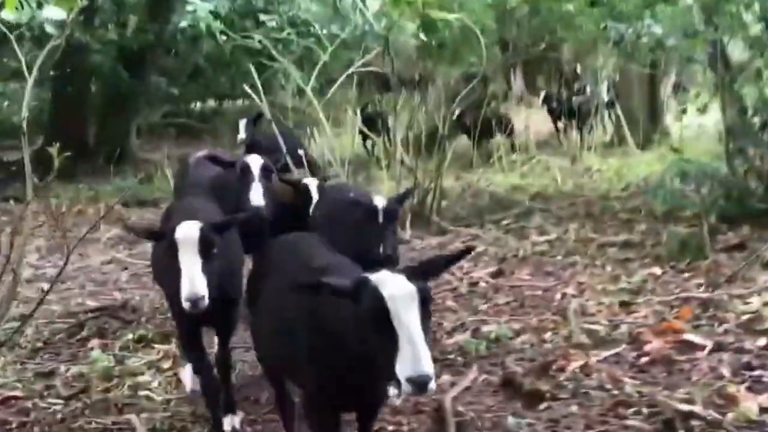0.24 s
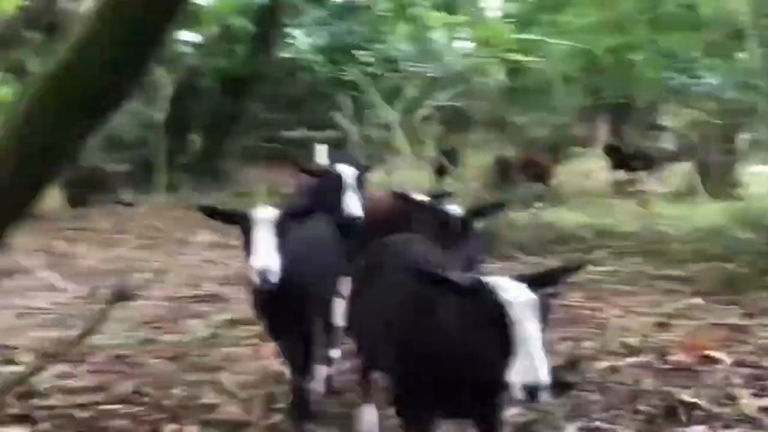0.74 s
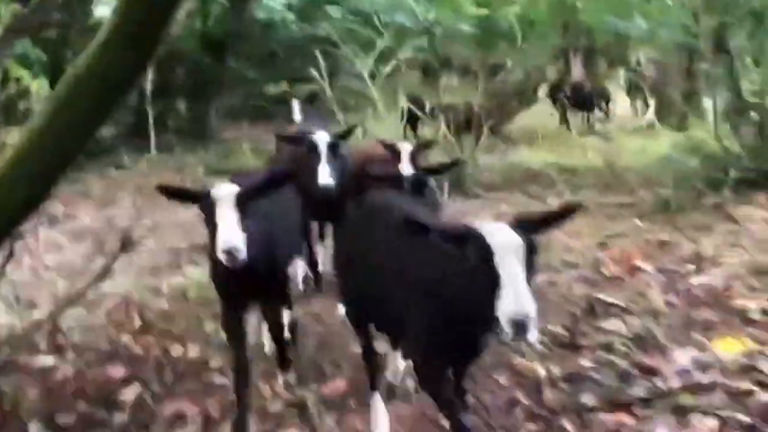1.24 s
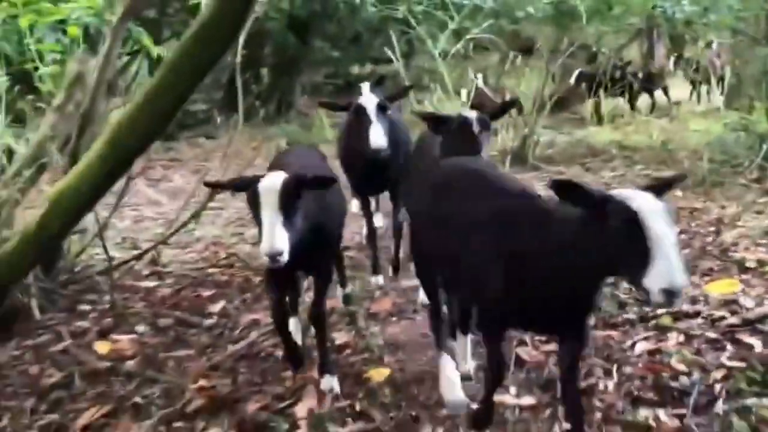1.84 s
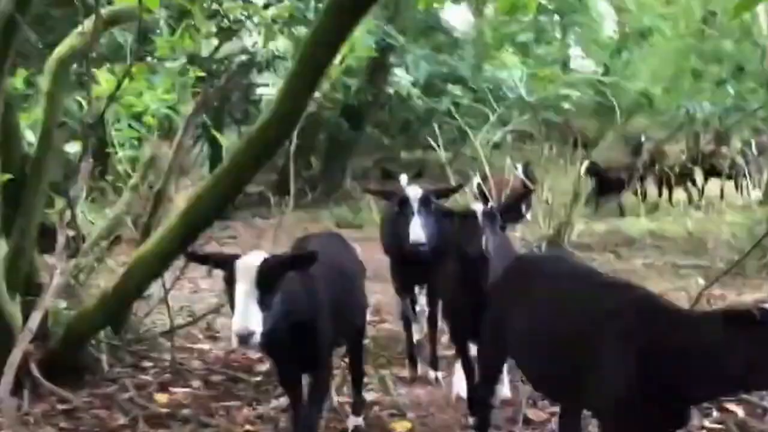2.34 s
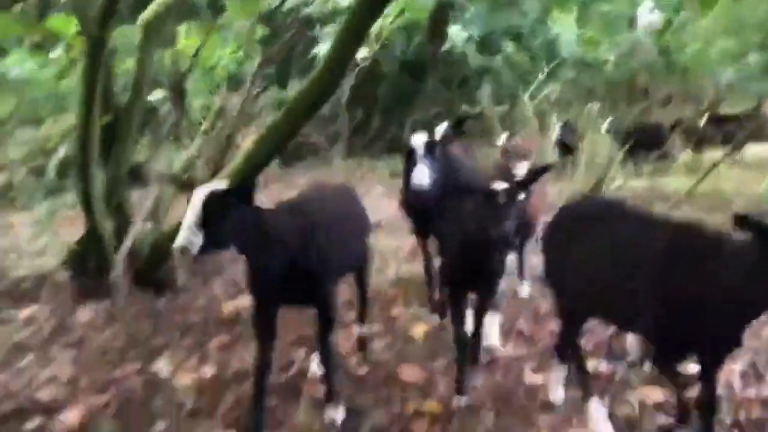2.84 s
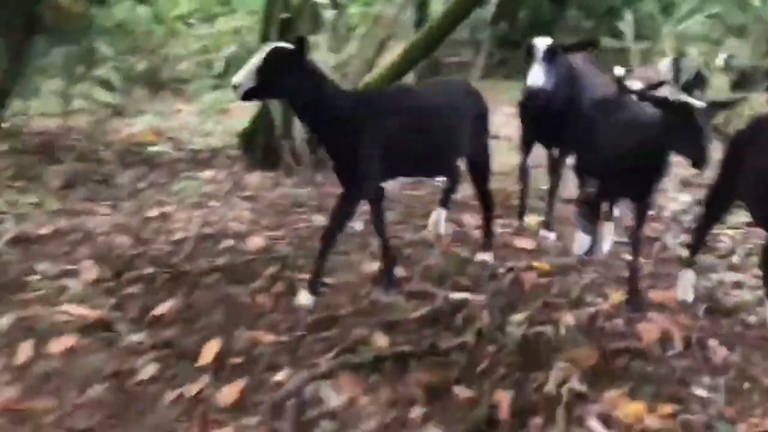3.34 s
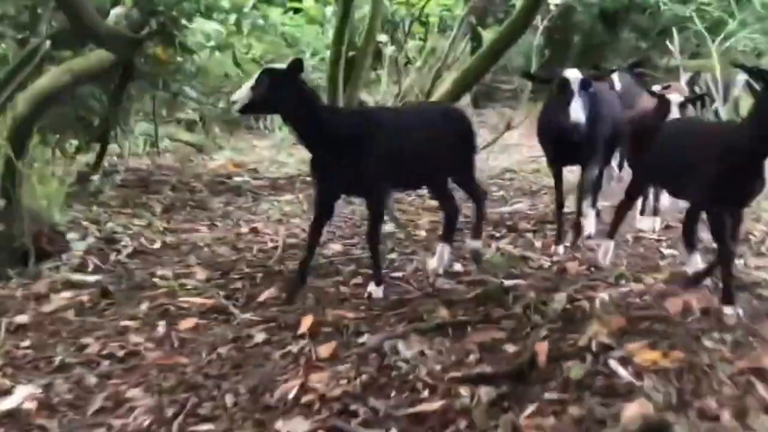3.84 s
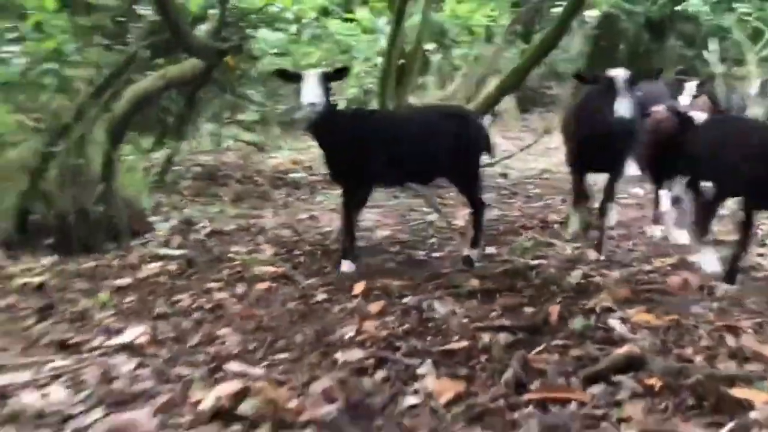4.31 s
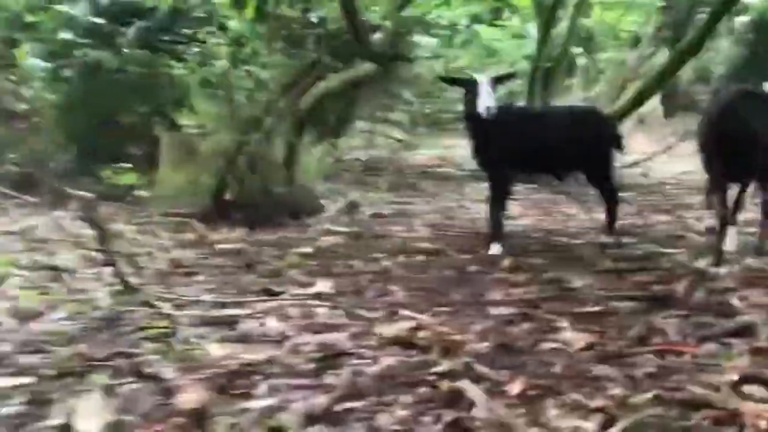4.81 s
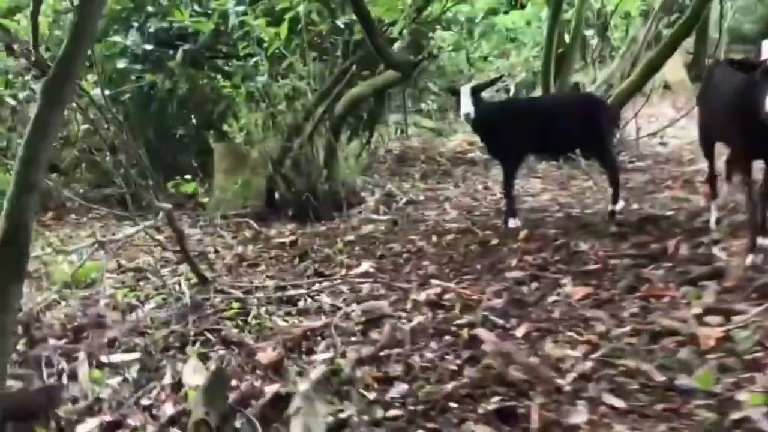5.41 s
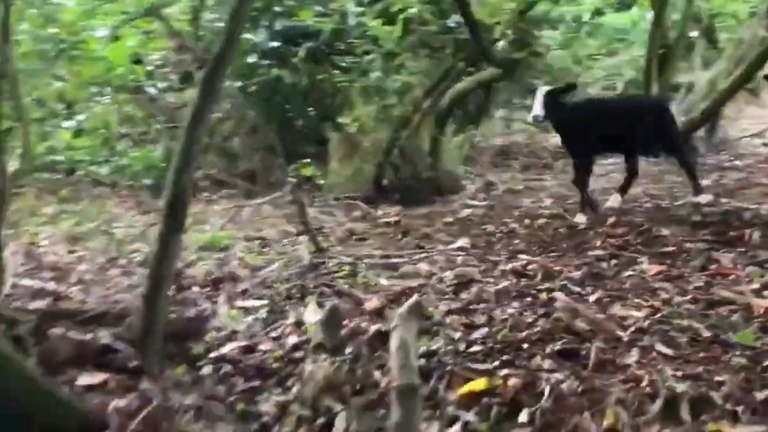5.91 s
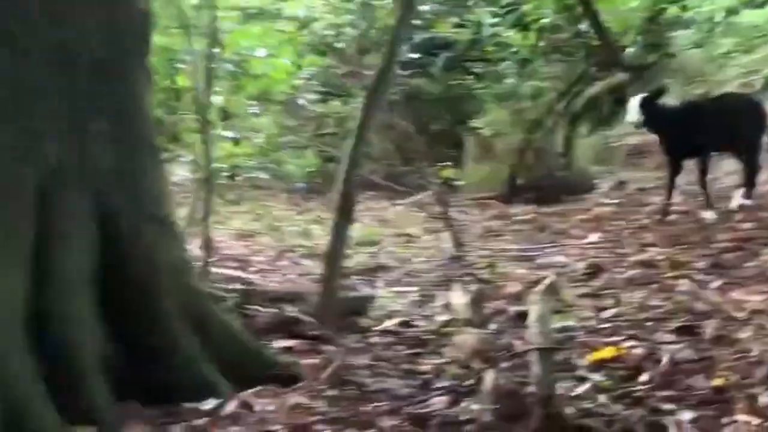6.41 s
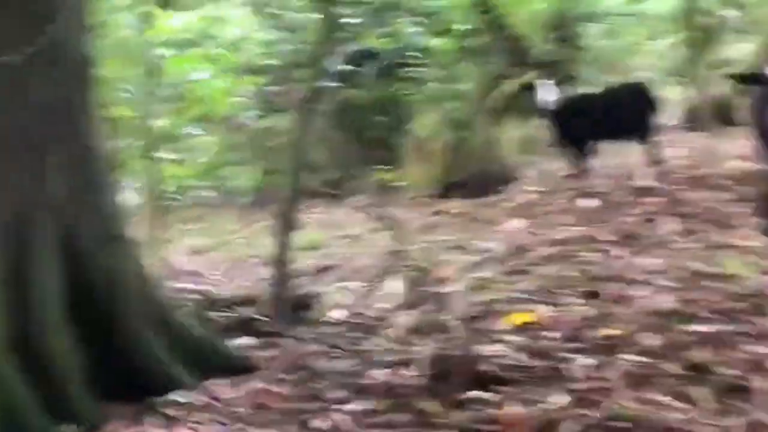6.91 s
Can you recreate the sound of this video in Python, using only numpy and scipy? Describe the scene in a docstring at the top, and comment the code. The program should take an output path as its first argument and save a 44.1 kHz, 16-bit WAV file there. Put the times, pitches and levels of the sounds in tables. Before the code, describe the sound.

Sheep moving over a woodland floor, heard from near the flock. Dry leaves crackle constantly, soft treads thud, hooves knock roots and twigs snap sharply. Six separate wavering bleats differ in pitch and roughness; the later ones start with a brief closed-mouth hum. The first and last are loudest, the third quietest and most quavering. Quiet outdoor air and short, sparse reflections from trunks.

```python
"""Sheep walk along a leafy woodland path; rustling litter, low rumble and quiet air last throughout.
A bleat is already sounding at the start, and a stick breaks during it; a second bleat follows at 1 s.
A quavering third comes at 3 s, then a ragged deep one, a clear one and a last one, each after a hum.
Pulses and breath ring a throat for each voice; feet are short pushes and noise bursts that thud,
knock and snap twigs all along. Sparse, dull echoes come back from the trees."""
import sys
import numpy as np
from scipy import signal
from scipy.fft import rfft, irfft
from scipy.io import wavfile
from scipy.ndimage import uniform_filter1d, map_coordinates

SR = 44100
rng = np.random.default_rng(int(sys.argv[2]) if len(sys.argv) > 2 else 0)


def transcribe(u):
    """Save the signal u as a 16-bit wav file named by the first command-line argument.

    u: samples, shape (n,) or (channels, n), limited to [-1, 1]; the rate is SR.
    q: integer samples, one column per channel.
    """
    v = np.clip(np.atleast_2d(u).T, -1, 1)
    q = np.round(v * 32767).astype(np.int16)
    wavfile.write(sys.argv[1], SR, q)


N = 315315
TIME = np.arange(N) / SR
HZ = np.fft.rfftfreq(4096, 1 / SR)  # frequencies at which all filters are drawn
EDGE_HZ = 16000  # upper limit of the recorder

# Colour of the still air. Each row: frequency in Hz, relative level in dB per Hz.
AIR = [(20, -16), (60, 5.5), (150, -2), (250, -7.5), (450, -8), (1000, -2.5), (1700, -14.5), (8000, -22.5),
       (16000, -12)]
AIR_DB = -64.5
# Bustle of the walking flock. Each row: time in seconds, leaf rustle in dB before the layers are mixed.
BUSTLE = [(0.0, -54.5), (0.42, -53.5), (0.8, -60.5), (1.89, -58.5), (2.29, -67), (2.81, -59.5), (2.95, -60),
          (4.92, -67.5), (5.73, -67), (6.35, -72), (6.77, -62), (7.15, -68)]
# Colours of the leaf rustle and the ground rumble. Each row: frequency in Hz, relative level in dB.
LEAVES = [(150, -25), (400, -4), (1000, -2), (2500, -3.5), (4600, -2), (8000, -5.5), (12500, -11),
          (15000, -11), (16000, -14)]
RUMBLE = [(20, -63), (53, -12), (120, -3), (165, -5), (210, -8.5), (320, -12.5), (600, -13.5), (1200, -59)]
GROUND_DB, GROUND_FOLLOWS = -61.5, 0.39  # rumble at average bustle, and its dB for each dB of bustle

# Soft treads on the soil, and hooves knocking on sticks and roots.
# Each row: start in seconds, peak in dB before a common gain, centre in Hz.
TREADS = [(0.141, -38, 166), (0.418, -44, 155), (0.566, -42.5, 141), (1.269, -41, 140), (1.409, -50, 129),
          (3.053, -43, 200), (3.145, -46.5, 234), (3.55, -44, 135), (3.79, -44, 316), (4.33, -44.5, 120),
          (5.29, -44, 304), (5.787, -37.5, 257), (5.843, -40.5, 133), (6.45, -46.5, 130), (6.686, -37, 163),
          (6.712, -42, 170)]
KNOCKS = [(2.474, -46.5, 1410), (2.701, -47.5, 437), (2.831, -47.5, 740), (2.869, -40.5, 1050),
          (3.054, -40.5, 1240), (3.147, -46, 398), (3.257, -40.5, 497), (3.543, -48, 570),
          (4.214, -40, 900), (4.305, -37.5, 830), (4.33, -45, 525), (4.477, -44.5, 470),
          (4.548, -44.5, 1020), (4.654, -49, 490), (5.787, -44, 425), (5.8435, -33, 592)]
# Twigs and dry leaves snapping. Each row: start in seconds, level in dB before a common gain,
# centre in Hz, relative level of the crushed leaves in dB, decay of the crack in seconds.
SNAPS = [(0.337, -31, 6000, -16, .0015), (0.3893, -24.5, 5500, -25, .0007), (0.468, -32, 4850, -4, .002),
         (0.558, -39, 3500, -8, .002), (0.748, -38, 2600, -13, .0015), (1.0261, -41, 6000, -18, .001),
         (1.718, -41.5, 7580, 2, .001), (1.948, -39, 5510, 5, .001), (2.129, -42.5, 6800, -14, .001),
         (2.319, -35.5, 3200, -21.5, .0013), (2.453, -41.5, 4700, -11, .001), (2.4744, -39, 2620, -2, .002),
         (2.702, -42, 4500, -6, .002), (2.774, -39.5, 4800, -20, .001), (2.809, -41, 2500, -20, .001),
         (2.872, -35, 2180, -13, .004), (3.257, -33, 2800, -16, .0012), (4.1079, -39, 5035, -39, .001),
         (4.478, -40, 1610, -10, .002), (4.869, -33.5, 5770, -18, .0018), (5.0243, -40, 2440, -15, .001),
         (5.6203, -30.5, 2600, -19, .002), (5.8434, -26, 2200, -29, .0005)]
# Colour of the snapping twigs and dry leaves. Each row: frequency in Hz, level in dB.
TWIG = [(1000, 0.5), (7500, 0.5), (11500, -4), (14500, 4)]
# A springy stick breaking in two cracks. Each row: start in seconds, level in dB.
STICK_CRACKS = [(0.3343, -34), (0.3372, -30)]
# Tones of that stick. Each row: frequency in Hz, level in dB, time to fall by 60 dB in seconds.
STICK = [(3320, 1, 0.016), (4000, -7, 0.015), (5080, -1, 0.0069), (8300, -5, 0.012)]

# The six bleats. Each row: mouth opening in seconds, length in seconds, time to full effort in seconds,
# level in dB, swell up to it in dB, fade after it in dB, share of the upper throat resonances in dB.
BLEATS = [(-0.1, 0.51, 0.053, -37, -24, 13.5, -2.0), (1.025, 0.99, 0.19, -46, 11, 16.5, -1.9),
          (2.99, 0.69, 0.23, -52, 13, 1.5, -1), (3.64, 0.745, 0.16, -44, 8, 8, -1),
          (5.247, 0.53, 0.28, -45.5, 1, 20.5, -2), (6.535, 0.92, 0.16, -37, 8, 17.5, -7.5)]
ATTACK_S, RELEASE_S, FADE_POWER, PITCH_LEAD_S = 0.034, 0.029, 2.77, 0.012
STRAIN_HZ = 2800  # overtones above this need a strained voice
# Resonances of each throat. Each row: frequency in Hz, width in Hz, relative level in dB.
FIRST_THROAT = [(250, 780, -6), (743, 130, 6.5), (940, 104, 7), (1270, 360, 0.5), (1870, 330, 3),
                (2240, 270, -4), (2456, 330, -0.5), (3190, 350, -7.5), (5800, 2000, -50)]
SECOND_THROAT = [(186, 35, -13), (793, 460, -9.5), (940, 250, -28), (1370, 460, -11), (1820, 270, 3.5),
                 (2538, 216, 4), (3190, 670, -8.5), (3960, 410, -10)]
QUAVER_THROAT = [(252, 360, -15), (800, 200, -7), (1790, 260, 4.5), (2670, 410, 2), (2970, 340, 5),
                 (4400, 780, -9.5)]
DEEP_THROAT = [(218, 111, 11), (608, 236, 7.5), (900, 190, -3), (1390, 250, 11), (2087, 340, 4.5),
               (2430, 420, -3), (3370, 1440, -7.5), (5340, 700, -20)]
CLEAR_THROAT = [(410, 790, 0.5), (810, 200, 3.5), (1034, 160, 3), (1590, 420, 9), (2010, 300, 9.5),
                (3080, 770, 5.5), (3640, 590, 4.5), (5500, 3000, -14)]
LAST_THROAT = [(250, 250, -16), (520, 300, -21), (805, 130, 1), (1350, 600, -20), (1710, 300, -11),
               (2200, 400, -24), (2660, 290, -9), (3080, 250, -22), (3550, 400, -23), (4280, 350, -21),
               (4850, 350, -27), (5600, 2500, -34)]
# Pitch of each voice before its tremble. Each row: time in seconds, pitch in Hz.
FIRST_PITCH = [(0.0, 246.2), (0.029, 252.3), (0.047, 242.7), (0.089, 243.9), (0.11, 229.4), (0.136, 238.9),
               (0.25, 227.4), (0.274, 229.8), (0.301, 219.8), (0.39, 208.7)]
SECOND_PITCH = [(1.03, 155), (1.107, 177.5), (1.157, 183.4), (1.445, 193.1), (1.612, 182.4), (2.0, 173.3)]
QUAVER_PITCH = [(2.98, 214.2), (3.194, 222.5), (3.472, 223.6), (3.648, 221.6)]
DEEP_PITCH = [(3.521, 109.4), (3.67, 136.3), (3.761, 158.8), (3.871, 163), (4.102, 156.6), (4.165, 147.2),
              (4.341, 139.7)]
CLEAR_PITCH = [(5.183, 225.4), (5.244, 241), (5.272, 259.5), (5.316, 266), (5.552, 262.9), (5.625, 251.7),
               (5.691, 241.3)]
LAST_PITCH = [(6.42, 131.7), (6.46, 148.9), (6.516, 163.3), (6.563, 181.4), (6.676, 194.6), (6.785, 204.3),
              (7.109, 202.2), (7.15, 193.7)]
# How ragged the voice folds run. One row for each bleat, of pairs: time in seconds, hoarseness from 0 to 1.
HOARSENESS = [
    [(0, .5), (.1, .5), (.125, .15), (.26, .18), (.31, .55), (.4, .55)],
    [(1.03, .45), (1.42, .18), (1.6, .27), (2, .35)],
    [(3, .38)],
    [(3.64, .62), (3.8, .5), (3.87, .18), (4.04, .17), (4.12, .4), (4.2, .58), (4.38, .62)],
    [(5.25, .25), (5.33, .1), (5.55, .09), (5.62, .45), (5.7, .55)],
    [(6.54, .2), (6.68, .3), (6.8, .2), (6.89, .05), (6.99, .06), (7.15, .12)],
]
# Lower throat resonances. One row for each bleat, of pairs: time in seconds, relative level in dB.
LOWS = [
    [(0, -1.5), (.03, 1.5), (.087, -5), (.105, -1), (.24, 2), (.3, -0.5), (.39, 3.5)],
    [(1.03, -11), (1.1, -6), (1.7, -1.5), (1.95, 4.5)],
    [(3, 0.5)],
    [(3.66, 2), (3.77, 2), (3.84, 0.5), (4.0, 4.5), (4.1, 2), (4.17, 1), (4.26, 2.5), (4.36, -10)],
    [(5.25, 1.5), (5.46, 0), (5.69, -2)],
    [(6.54, -10), (6.6, -3.5), (6.64, -1), (6.72, -2), (6.9, 2), (7.0, 0), (7.055, -5.5), (7.12, 0.5),
     (7.15, -14)],
]


def amp(db):
    """Turns dB into a gain."""
    return 10 ** (np.asarray(db) / 20)


def evened(x):
    """Scales to an rms (average strength) of 1."""
    return x / np.sqrt(np.mean(x ** 2) + 1e-20)


def steadied(x):
    """Holds the running rms at 1."""
    return x / np.sqrt(np.abs(uniform_filter1d(x ** 2, size=2600)) + 1e-12)


def add(mix, s, sound):
    """Mixes a sound in at time s."""
    part = mix[max(round(s * SR), 0):][:len(sound)]
    part += sound[:len(part)]


def drift(n, hz):
    """Slow random wander of rms about 1, up to about hz."""
    place = np.arange(n) * 2 * hz / SR
    knots = rng.standard_normal(4096)
    return map_coordinates(knots, [place], order=2, mode="wrap") * 1.1


def spectrum(points):
    """Gain at HZ from (Hz, dB) points."""
    f, db = np.transpose(points)
    return amp(np.interp(np.log(HZ + 1), np.log(f + 1), db))


def resonances(modes):
    """Gain at HZ of steep-sided resonances (Hz, width, dB)."""
    peaks = [amp(db) / (1 + (2 * (HZ - hz) / width) ** 2) for hz, width, db in modes]
    return np.sqrt(sum(peak ** 2 for peak in peaks))


def hill(hz, octaves):
    """Gain at HZ of a broad bump around hz."""
    return 1 / (1 + (np.log2((HZ + 1) / hz) / octaves) ** 4)


def colour(x, gain):
    """Causal filter with the given gain: it rings only after what excites it."""
    log_gain = np.log(np.maximum(np.r_[gain, gain[-2:0:-1]], 1e-5))
    taps = np.fft.ifft(np.exp(np.conj(signal.hilbert(log_gain)))).real
    return signal.oaconvolve(x, taps)[:len(x)]


def moving(x, gain, stretch):
    """Filter whose resonances all follow the factor stretch: time is warped, filtered and warped back."""
    n = np.arange(len(x))
    warped = np.cumsum(stretch)
    even = map_coordinates(x, [np.interp(np.arange(warped[-1] + 1), warped, n)], order=3)
    return map_coordinates(colour(even, gain), [warped], order=3)


def still_air():
    """The quiet air of the wood is steady coloured noise."""
    return amp(AIR_DB) * evened(colour(rng.standard_normal(N), spectrum(AIR)))


def ground_rumble(bustle_db):
    """Many feet make the ground rumble: low, lumpy noise that partly follows the bustle."""
    ground_db = GROUND_DB + GROUND_FOLLOWS * (bustle_db - bustle_db.mean())
    lumps = amp(4.0 * drift(N, 20.5))
    return amp(ground_db) * evened(colour(rng.standard_normal(N), spectrum(RUMBLE)) * lumps)


def leaf_crackles(per_s=700, spread_db=2.5, patch_db=3):
    """Leaves of many sizes give tiny clicks in four bands, each with its own stream."""
    crackles = np.zeros(N)
    for hz in np.geomspace(1800, 14000, 4):
        size_db = spread_db * np.minimum(rng.exponential(1, N), 3.5)
        sizes = amp(size_db + patch_db * drift(N, 18))
        breaks = rng.choice([-1, 1], N) * sizes * (rng.random(N) < per_s / SR)
        crackles += evened(colour(breaks, hill(hz, 1))) * np.sqrt(hz)
    return evened(crackles)


def leaf_rustle(bustle_db, rustle_db=-2, crackle_db=3, clump_db=2, steps_per_s=12, settle_s=0.017):
    """Noise and crackles swell at each light step that stirs the leaves, and die down as they settle."""
    stir = amp(rustle_db) * rng.standard_normal(N) + amp(crackle_db) * leaf_crackles()
    steps = rng.random(N) * (rng.random(N) < steps_per_s / SR)
    stirred = signal.lfilter([1], [1, -np.exp(-1 / (settle_s * SR))], steps)
    clumps = evened(np.sqrt(1 + amp(clump_db) ** 2 * 2 * stirred))
    return amp(bustle_db) * colour(stir * clumps, evened(spectrum(LEAVES)))


def litter():
    """Many feet stir the leaves and shake the ground, with a shared bustle."""
    bustle_db = np.interp(TIME, *np.transpose(BUSTLE))
    return leaf_rustle(bustle_db) + ground_rumble(bustle_db)


def trees(x, wet_db, t60):
    """Trunks scatter the sound back as sparse, dull echoes that fall by 60 dB in t60 seconds."""
    t = np.arange(SR) / SR
    sparse = rng.standard_normal(SR) * (rng.random(SR) < 1500 / SR)
    taps = colour(sparse * (t > .005) * amp(-60 * t / t60), hill(1780, 4.1))
    # the echo is halved besides wet_db
    return amp(wet_db) * signal.oaconvolve(x, taps / np.linalg.norm(taps) / 2)[:N]


def along_ground(x, lag_s=0.00794, corner_hz=400):
    """Sound skimming the porous leaf bed arrives treble first: each click becomes a quick falling chirp."""
    hz = np.fft.rfftfreq(2 * N, 1 / SR)
    turn = 2 * np.pi * lag_s * corner_hz * np.log1p(hz / corner_hz)
    return irfft(rfft(x, 2 * N) * np.exp(-1j * turn))[:N]


def blows(rows, gain_db, push_s, octaves, scuff_db, scuff_s):
    """A foot lands: one damped push, with a scuff as the ground gives way."""
    out, t = np.zeros(N), np.arange(SR // 5) / SR
    for s, db, hz in rows:
        scuff = rng.standard_normal(len(t)) * np.exp(-t / scuff_s)
        push = colour(np.exp(-t / push_s), hill(hz, octaves))
        blow = evened(push) + amp(scuff_db) * evened(colour(scuff, hill(hz, octaves)))
        add(out, s, amp(db + gain_db) * blow / np.abs(blow).max())
    return out


def treads():
    """Feet thud on the soil: low pushes with a strong scuff."""
    return blows(TREADS, gain_db=-0.5, push_s=0.00081, octaves=0.76, scuff_db=6.0, scuff_s=0.019)


def knocks():
    """Hooves knock on sticks and roots: short, mostly higher pushes with a weaker, quicker scuff."""
    return blows(KNOCKS, gain_db=6.0, push_s=0.00046, octaves=1.26, scuff_db=-1.5, scuff_s=0.004)


def snaps(gain_db=-7.0, rise_s=0.004, crush_s=0.018, octaves=2):
    """A quick rise of noise leads into a twig's crack, and crushed leaves crackle briefly after it."""
    lead = SR // 50  # samples before the crack
    out, t = np.zeros(N), np.arange(-lead, SR // 7) / SR
    for s, db, hz, crush_db, crack_s in SNAPS:
        crack, crush, size = rng.standard_normal((3, len(t)))
        tear = np.clip(t / .0005, 0, 1) * np.exp(-np.abs(t) / crack_s)
        rise_and_fall = np.exp(np.minimum(t / rise_s, -t / crush_s))
        burst = crack * tear + amp(crush_db) * crush * size * rise_and_fall
        snap = colour(burst, hill(hz, octaves) * spectrum(TWIG))
        first_5_ms = snap[lead:][:SR // 200]
        add(out, s - lead / SR, amp(db + gain_db) * snap / np.sqrt(np.mean(first_5_ms ** 2)))
    return out


def stick():
    """Each crack of the breaking stick sets its tones ringing."""
    out, t = np.zeros(N), np.arange(SR // 10) / SR
    ring = sum(amp(db - 60 * t / t60) * np.sin(2 * np.pi * hz * t) for hz, db, t60 in STICK)
    for s, db in STICK_CRACKS:
        add(out, s, amp(db) * ring)
    return out


def effort(number, age):
    """Loudness of a call: effort swells to its top and then runs out."""
    _, length, rise_s, top_db, swell_db, fade_db, _ = BLEATS[number]
    rising = np.maximum(1 - age / rise_s, 0)
    fading = np.maximum((age - rise_s) / (length - rise_s), 0)
    return amp(top_db - swell_db * rising ** 2 - fade_db * fading ** FADE_POWER)


def fold_pulses(turns, pitch, flicker_db, flicker_hz, scatter):
    """The beating folds give 35 partials; scatter spreads their phases, in radians."""
    n = len(turns)
    folds = np.zeros(n)
    # paths by way of ground and trunks shift as the head moves:
    # the short waves wander in strength and phase
    for k in range(1, 36):
        shortness = np.minimum(k * pitch / 2000, 1)
        strength = amp(flicker_db * shortness ** 2 * drift(n, flicker_hz))
        phase = scatter * rng.standard_normal() + shortness * drift(n, flicker_hz / 4)
        folds += strength * np.cos(2 * np.pi * k * turns + phase)
    return evened(folds)


def breath_puffs(turns):
    """Air hisses through the folds in one puff for each cycle."""
    puffs = (.2 + np.exp(-(turns % 1) / .22)) * rng.standard_normal(len(turns))
    return colour(evened(puffs), 1.8 * HZ / (HZ + 600))


def strained(high, t, length, peak_s, loss_db):
    """The highest overtones are strongest at peak_s and lose loss_db half a call away."""
    low_pass = signal.butter(4, STRAIN_HZ, fs=SR, output="sos")
    dull = signal.sosfiltfilt(low_pass, high)
    return dull + (high - dull) * amp(-loss_db * np.minimum(2 * np.abs(t - peak_s) / length, 1))


def closed_hum(drive, since_start, mouth, hum_s, hum_db):
    """A nasal tone grows behind the closed mouth and gives way as it opens."""
    shut = np.sqrt(np.minimum(since_start / hum_s, 1)) * (1 - mouth)
    nose = resonances([(227, 234, 0.5), (2230, 5200, -24)])
    return amp(hum_db) * shut * evened(colour(drive, nose))


def bleat(number, pitches, throat, tremble, hum=None, strain=None, widening=1.0, split_hz=1350,
          jitter=0.0368, flicker_db=3.0, flicker_hz=14, scatter=0.97):
    """Fold pulses and puffs of breath ring a throat, whose upper resonances shift by widening."""
    opens, length, upper_db = BLEATS[number][0], BLEATS[number][1], BLEATS[number][-1]
    # tremble: rate, time of a crest in s, depth at start and end, swings of pitch and upper resonances
    shake_hz, crest_s, start_db, end_db, pitch_swing, throat_swing = tremble
    hum_s = hum[0] if hum else 0
    t = np.arange(max(opens - hum_s, 0), opens + length, 1 / SR)
    n, age = len(t), np.clip(t - opens, 0, length)
    pitch = np.interp(t, *np.transpose(pitches))
    hoarse = np.interp(t, *np.transpose(HOARSENESS[number]))
    low_db = np.interp(t, *np.transpose(LOWS[number]))
    mouth = np.minimum(age / ATTACK_S, 1)
    release = np.minimum((length - age) / RELEASE_S, 1)

    depth_db = start_db + (end_db - start_db) * age / length
    shake = np.cos(2 * np.pi * shake_hz * (t - crest_s))
    # the pitch runs ahead of the tremble, so it droops through each pulse
    waver = np.cos(2 * np.pi * shake_hz * (t - crest_s + PITCH_LEAD_S)) + drift(n, shake_hz) / 2
    # hoarse folds beat less regularly and let more air through in each cycle
    turns = np.cumsum(pitch * (1 + pitch_swing * waver + jitter * hoarse * drift(n, 105))) / SR
    folds = fold_pulses(turns, pitch, flicker_db, flicker_hz, scatter)
    drive = (1 - hoarse) * folds + hoarse * breath_puffs(turns)
    drive = drive * amp(3 * hoarse * drift(n, 80))

    # the open mouth puts a share of the energy into the upper resonances, which also tremble most
    lower = 1 / (1 + (HZ / split_hz) ** 8)
    upper = (1 - lower) / (1 + (HZ / 7500) ** 4)
    share = np.clip(amp(upper_db) ** 2, .02, .92)
    low = np.sqrt(1 - share) * amp(low_db) * steadied(colour(drive, resonances(throat) * lower))
    throat_waver = throat_swing * (waver + drift(n, shake_hz)) / 2
    stretch = 1 + (widening - 1) * (age / length) ** 3 + throat_waver
    high = moving(drive, resonances(throat) * upper, stretch)
    if strain:
        high = strained(high, t, length, *strain)
    high = np.sqrt(share) * steadied(high)
    trembling = low * amp(depth_db * shake / 2) + high * amp(depth_db * shake)
    voice = mouth * release * effort(number, age) * trembling
    if hum:
        voice += closed_hum(drive, t - t[0], mouth, *hum)
    return t[0], voice


def flock():
    """Six bleats, each with its own voice; the third quavers and the deep fourth is the most ragged."""
    out = np.zeros(N)
    first, second, quaver, deep, clear, last = range(len(BLEATS))
    # hum: seconds before the call, dB; strain: time of its peak in seconds, loss in dB
    add(out, *bleat(first, FIRST_PITCH, FIRST_THROAT, tremble=(16.2, 0.026, 2.9, 1.2, 0.003, 0.015),
                    jitter=0.02, flicker_db=4.0, flicker_hz=19.3, scatter=0.61))
    add(out, *bleat(second, SECOND_PITCH, SECOND_THROAT, tremble=(10.0, 1.7, 0.66, 1.08, 0.0058, 0.014),
                    strain=(1.42, 5), widening=0.95, jitter=0.027, flicker_db=4.0, flicker_hz=15.94))
    add(out, *bleat(quaver, QUAVER_PITCH, QUAVER_THROAT, tremble=(12.9, 3.415, 4, 7, .015, .02),
                    jitter=.035, split_hz=1600, flicker_db=2.5))
    add(out, *bleat(deep, DEEP_PITCH, DEEP_THROAT, tremble=(11.9, 4.14, 0.33, 0.67, 0.0029, 0.0091),
                    hum=(.14, -51), strain=(3.9, 4), widening=1.09, split_hz=1640,
                    jitter=0.027, flicker_db=3.5, flicker_hz=22.1, scatter=2.7))
    add(out, *bleat(clear, CLEAR_PITCH, CLEAR_THROAT, tremble=(9.5, 5.66, 0.52, .9, 0.0019, 0.011),
                    hum=(.085, -45.5), widening=1.047, split_hz=1400,
                    flicker_db=4.5, flicker_hz=14.04, scatter=2.07))
    add(out, *bleat(last, LAST_PITCH, LAST_THROAT, tremble=(15.34, 7.005, 0.29, 2.3, 0.0021, 0.042),
                    hum=(.14, -56), strain=(6.88, 5), widening=0.91,
                    jitter=0.019, flicker_db=3.0, flicker_hz=14.16, scatter=1.73))
    return out


def scene():
    """Voices and footfalls with their echo, over the rustling litter and the quiet air of the wood."""
    near = flock() + along_ground(snaps() + knocks()) + stick() + treads()
    echo = trees(near, wet_db=-4.0, t60=0.27)
    return (near + echo + litter() + still_air())[None]


def record(dry):
    """The band limit of the recorder: a steep low-pass filter."""
    low_pass = signal.firwin(511, EDGE_HZ, window=("kaiser", 9), fs=SR)
    return signal.oaconvolve(dry, low_pass[None], "same")


dry = scene()
out = record(dry)
transcribe(out)
```